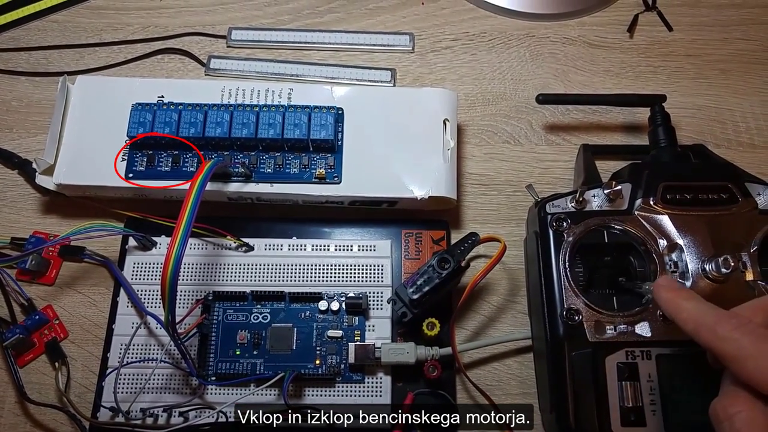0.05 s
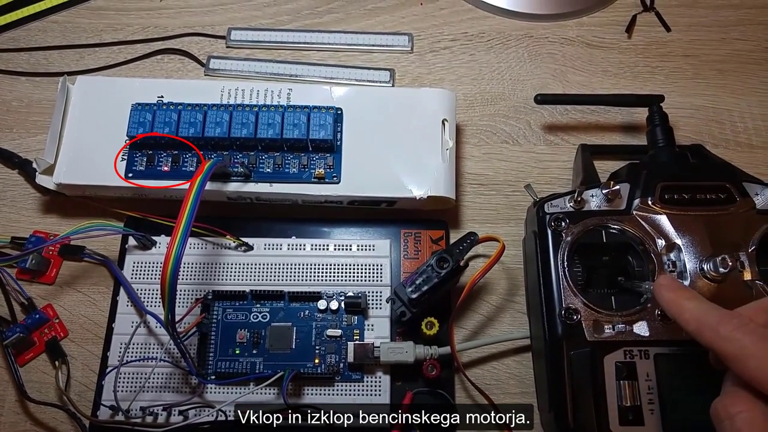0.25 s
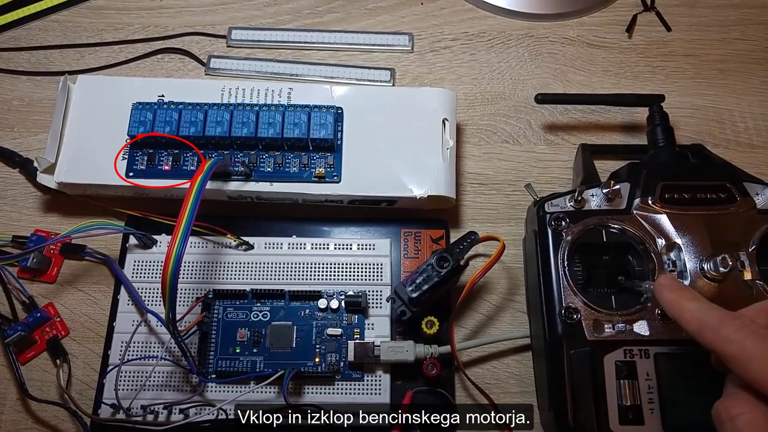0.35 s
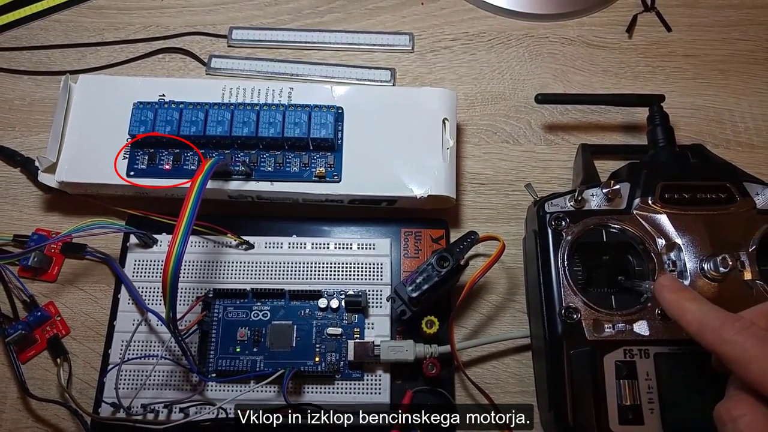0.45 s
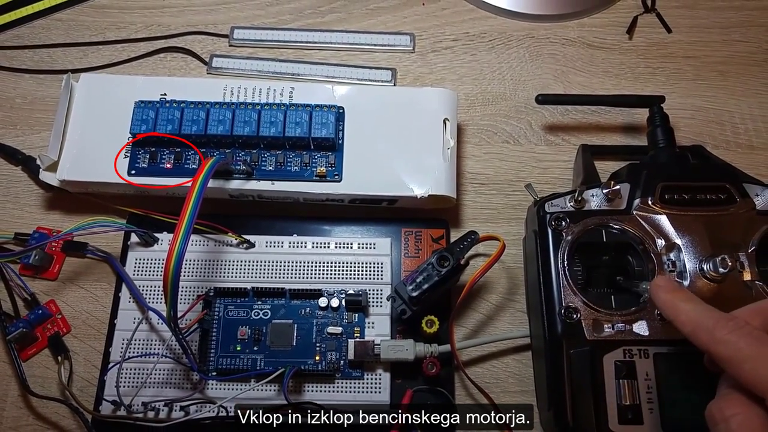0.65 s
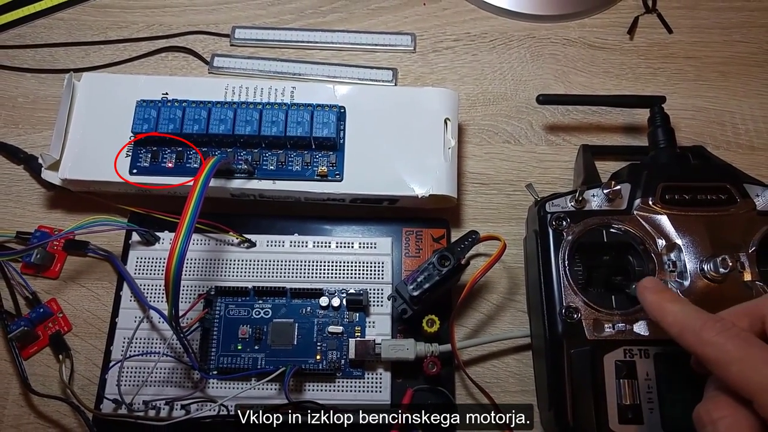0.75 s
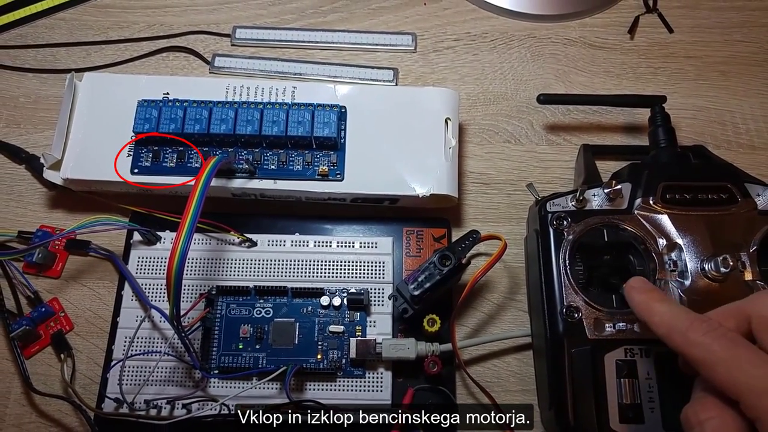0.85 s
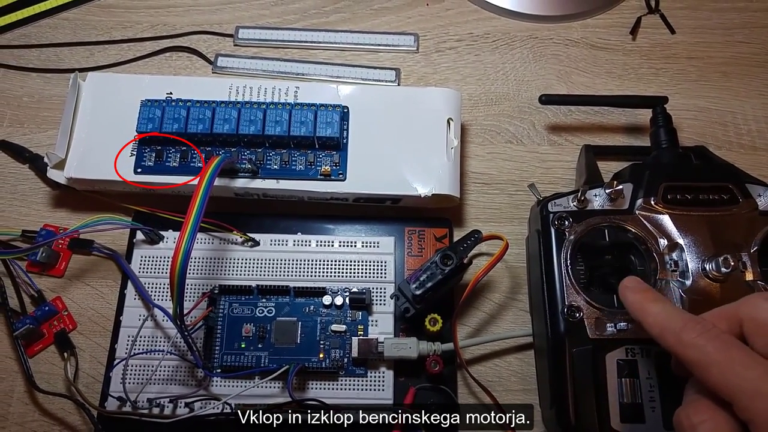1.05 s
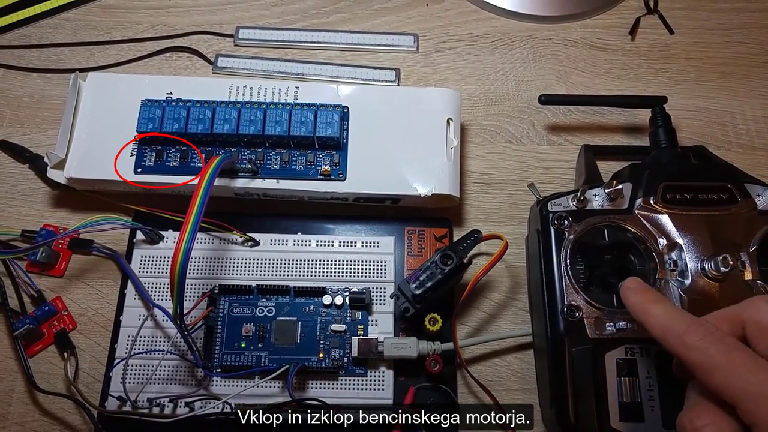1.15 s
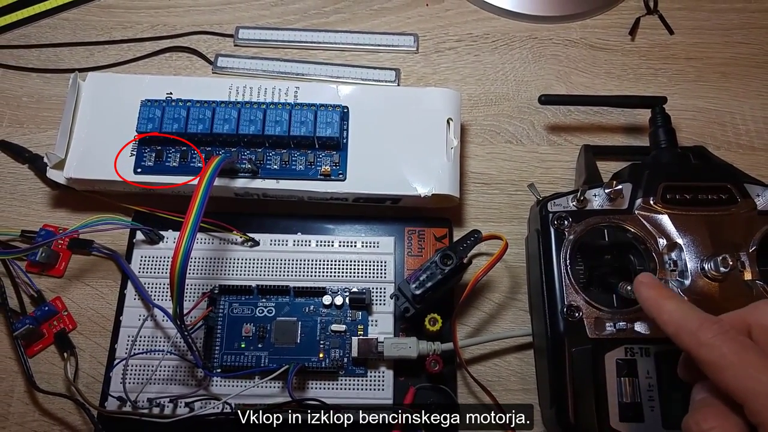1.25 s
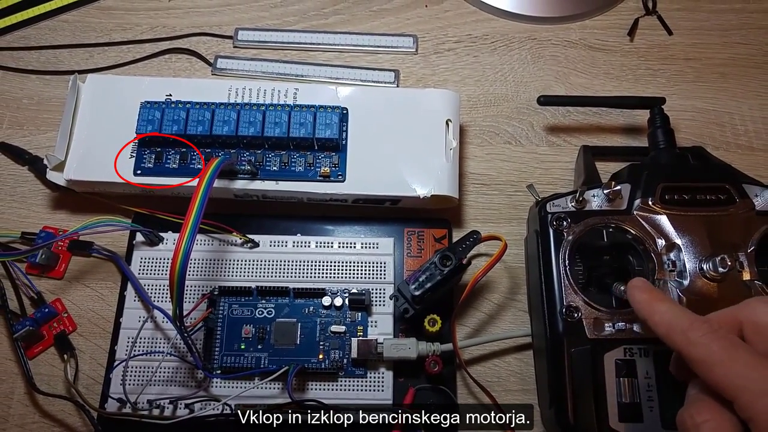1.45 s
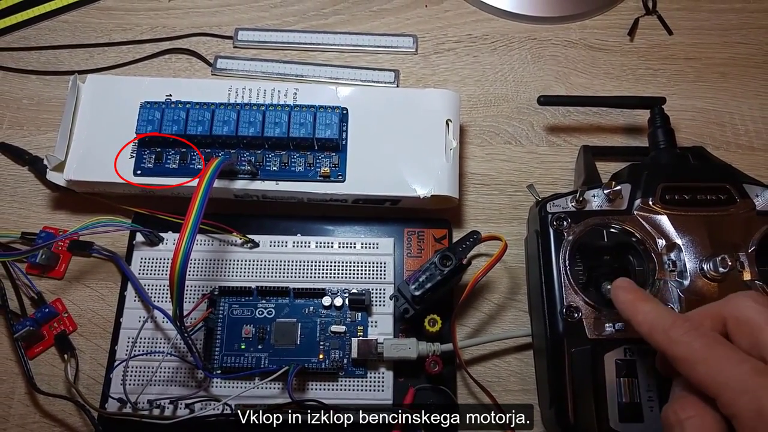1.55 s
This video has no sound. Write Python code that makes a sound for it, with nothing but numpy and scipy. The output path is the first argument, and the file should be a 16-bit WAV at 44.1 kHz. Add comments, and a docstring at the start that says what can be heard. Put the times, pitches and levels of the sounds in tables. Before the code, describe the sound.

Close in stereo, one hard bright relay click with a slight low thump, a pause, then a second slightly different click; barely audible hand knocks and ticks, soft fan rush and thin electrical whine in a small room.

```python
"""A small room: a relay on a board lying on a plastic box switches twice, close to a stereo camera.
On pull-in and on release a burst of contact blows rings the shell modes, then the box modes; a boom follows
the pull-in. Faint ticks and dull hand knocks lie around them, and a noise tail gives the room's reflections.
A fan hums in wavering sines, a supply whines in harmonics, and shaped noise makes fan rush and hiss."""
import sys
import numpy as np
from scipy import signal
from scipy.fft import rfft, irfft
from scipy.io import wavfile
from scipy.ndimage import uniform_filter1d

SR = 44100
rng = np.random.default_rng(int(sys.argv[2]) if len(sys.argv) > 2 else 0)


def makeup_ratio(level_db):
    """Linear amplitude ratio for a level in decibels (20 dB per factor of ten)."""
    decades = np.asarray(level_db, float) / 20
    return 10 ** decades


def file_out(sig):
    """Save sig as 16-bit WAV at sys.argv[1]."""
    # one column per channel
    cols = np.atleast_2d(sig).T
    # limit, then scale
    lim = np.clip(cols, -1, 1)
    pcm = np.round(lim * 32767).astype(np.int16)
    wavfile.write(sys.argv[1], SR, pcm)


N = 70560

# Contact blows of each stroke. Each row: start in seconds, level in dB, left minus right in dB.
PULL_IN_BLOWS = [(.2340, -36, 0), (.2356, -32, 0), (.2364, -14, 2), (.2371, -1, 3), (.2375, -2, -2),
                 (.2381, -2, 7), (.2385, -3, 7), (.2391, -8, 0), (.2399, -15, -12), (.2405, -16, -12),
                 (.2411, -17, -4), (.2428, -18, 2)]
RELEASE_BLOWS = [(.9340, -38, 0), (.9362, -28, 0), (.9373, -2, 1), (.9383, -2, 2), (.9396, -4, 2),
                 (.9405, -3, 0), (.9409, -5, 0), (.9415, -8, 2), (.9434, -10, -3), (.9448, -14, 0)]
# Relay shell modes. Each row: nominal pitch in Hz, t60 in seconds, level on pull-in in dB, on release in dB.
SHELL_MODES = [(2500, 0.015, -31.5, -23.5), (3210, .003, -53.5, -46), (3830, 0.0078, -24.5, -20.5),
               (4610, 0.009, -42, -22), (6160, .003, -14.5, -37), (6770, 0.0067, -6, -9.5),
               (7870, 0.0024, -15, 2), (8540, 0.0043, 1, -1.5), (8897, 0.009, 1.5, -0.5),
               (9740, .003, -28.5, -0.5), (10777, 0.0055, -11.5, -16), (11660, 0.022, -15, -31),
               (13200, .003, -20.5, -30.5), (14200, 0.009, -19.5, -29.5), (14170, .004, -23, -26)]
# Box and bench modes. Each row: pitch in Hz, t60 in seconds, level on pull-in in dB, on release in dB.
BOX_MODES = [(59.5, 0.1, -46.5, -58.5), (242, 0.24, -42.5, -48), (324, 0.08, -35, -44.5),
             (390, 0.11, -52, -35.5), (471, 0.1, -37.5, -47), (648.2, 0.073, -24, -14),
             (708.6, 0.072, -25, -14), (945, 0.051, -37, -22), (1153, .04, -28, -27),
             (1370, 0.042, -54, -24.5), (1960, .02, -52.5, -34.5)]
# Low boom after the pull-in. Each row: start in seconds, pitch in Hz, level in dB, rise in seconds,
# t60 in seconds.
BOOMS = [(.255, 127.2, -22, 0.018, 0.13)]
# Faint ticks. Each row: start in seconds, pitch in Hz, level in dB, t60 in seconds, left minus right in dB.
FAINT_TICKS = [(0.734, 7000, -46, 0.0034, 3), (0.7384, 7100, -44.5, 0.0044, 26),
               (1.088, 1040, -50.5, 0.026, 1), (1.088, 1500, -54.5, 0.021, 7)]
# Dull knocks of the hand on the bench or controller. Each row: start in seconds, centre in Hz, width in Hz,
# noise level before the envelope in dB, rise in seconds, t60 in seconds.
HAND_KNOCKS = [(.27, 298, 300, -41.5, .02, 0.18), (0.969, 119.7, 100, -53.5, 0.018, 0.3),
               (1.11, 148, 121, -48, 0.0094, 0.115), (1.388, 400, 100, -49.5, 0.025, .12),
               (1.499, 182, 80, -57.5, 0.014, 0.36)]
# Room tail bands. Each row: centre in Hz, t60 in seconds, level in dB.
ROOM_BANDS = [(126.8, 0.5, -25), (250, 0.26, -19), (497, 0.24, -7.5), (990, 0.22, -5.5), (2000, 0.14, 0.5),
              (4252, 0.23, -2.5), (6500, 0.19, -3), (9200, .21, -12), (12600, 0.11, 2), (14500, .18, -1.5),
              (16000, .18, -5)]
# Fan hum tones. Each row: pitch in Hz, mean level in dB rms, left minus right in dB, left phase lead in
# radians, waver in dB.
HUM_TONES = [(120, -75, -1, .3, 3), (243.5, -63, 0, .1, 1), (292, -78, 0, .5, 3), (575, -80, 0, 1, 3),
             (670, -80, 0, 1, 2), (719, -70, 0, 1.3, 3), (767.5, -71, 0, 1.3, 3)]
# Supply whine harmonics. Each row: multiple of WHINE_HZ, mean level in dB rms, left minus right in dB.
WHINE_HARMONICS = [(3, -68, 14), (4, -86, 0), (5, -82, -4), (6, -96, 0)]
# Background noise spectrum. Each row: frequency in Hz, relative density in dB per Hz.
FLOOR_SPECTRUM = [(20, -49), (30, -25), (80, -18), (125, -17), (190, -16.5), (290, -11), (400, -10.5),
                  (500, -30.5), (650, -5), (800, -14.5), (900, -17), (1200, -22.5), (2000, -25.5),
                  (3600, -29.5), (5500, -28.5), (6300, -24.5), (7000, -20.5), (7600, -31.5), (8100, -26.5),
                  (10000, -25.5), (12300, -26.5), (13500, -39), (16000, -63.5)]
# Background stereo likeness. Each row: frequency in Hz, likeness of left and right from -1 to 1.
FLOOR_LIKENESS = [(60, 0.8), (130, 0.5), (290, .85), (640, 0.18), (1400, -0.13), (6800, -0.17)]
# Background stereo lean. Each row: frequency in Hz, left minus right in dB.
FLOOR_LEAN = [(60, -1), (2400, -1), (4400, -2.5), (7000, 23.5), (10000, -0.5), (15000, -5)]

CRACK_DB, RIGHT_LAG_S = -14.5, .0002
PHASE_SPREAD_RAD, DETUNE = .8, .025  # spread of mode phase and of fractional pitch from blow to blow
BOX_LATE_S, BOX_RISE_S, BOX_PAN_DB, BOX_LAG_S = .0022, .0021, 3.5, .00017
ROOM_START_S = .003
WHINE_HZ = 2423.6
FLOOR_DB = -60.5  # rms over both sides
TOP_HZ = 16200


def read(table, hz):
    """A (Hz, value) table read on a log-frequency axis."""
    a = np.array(table, float)
    return np.interp(np.log(np.maximum(hz, 1)), np.log(a[:, 0]), a[:, 1])


def band_weight(centres_hz, k, hz):
    """Triangle on log frequency: 1 at centre k, 0 at its neighbours; end bands stay at 1 beyond."""
    return read([(f, float(j == k)) for j, f in enumerate(centres_hz)], hz)


def pan(db):
    """Left and right gains as a column, from left minus right in dB."""
    return makeup_ratio(np.array([[db / 2], [-db / 2]]))


def ring(hz, t60_s, rise_s=0., phase=0., late_s=0.):
    """One decaying mode, .4 s long, with a soft start; 0 Hz at phase pi/2 gives the bare envelope."""
    t = np.maximum(np.arange(int(.4 * SR)) / SR - late_s, 0)
    onset = (1 - np.exp(-t / (rise_s + 1e-5))) ** 2
    return np.sin(2 * np.pi * hz * t + phase) * onset * 1000. ** (-t / t60_s)


def add(out, start_s, x):
    """Mix x into out at start_s."""
    i = int(start_s * SR)
    out[:, i:i + x.shape[1]] += x[:, :N - i]


def walk(rate_hz):
    """Slow random wander held within -2..2."""
    k = int(SR / rate_hz)
    held = np.repeat(rng.standard_normal(N // k + 5), k)
    smooth = uniform_filter1d(uniform_filter1d(held, k), k)
    return 2 * np.tanh(.7 * smooth[2 * k:2 * k + N])


def shell_blow(column, late_s):
    """One contact blow: shell modes with scattered phase and pitch, plus a short noise crack."""
    spread = [[PHASE_SPREAD_RAD], [DETUNE]]
    phases, detunes = rng.standard_normal((2, len(SHELL_MODES))) * spread
    blow = 0
    for mode, phase, detune in zip(SHELL_MODES, phases, detunes):
        blow = blow + makeup_ratio(mode[column]) * ring(mode[0] * (1 + detune), mode[1], 76e-6, phase, late_s)
    crack = rng.standard_normal(len(blow)) * ring(0, .0014, 0, np.pi / 2, late_s)
    return blow + makeup_ratio(CRACK_DB) * crack


def box_ring(column):
    """Box and bench modes with a soft rise, the right side lagging the left."""
    phases = rng.uniform(0, 2 * np.pi, len(BOX_MODES))
    sides = []
    for late_s in (0, BOX_LAG_S):
        sides.append(sum(makeup_ratio(mode[column]) * ring(mode[0], mode[1], BOX_RISE_S, phase, late_s)
                         for mode, phase in zip(BOX_MODES, phases)))
    return pan(BOX_PAN_DB) * np.array(sides)


def relay():
    """Contacts strike and bounce, each blow ringing the shell; the hardest of a stroke sets the box going."""
    out = np.zeros((2, N))
    for column, blows in ((2, PULL_IN_BLOWS), (3, RELEASE_BLOWS)):
        for start_s, db, lean_db in blows:
            for side, late_s in enumerate((0, RIGHT_LAG_S)):
                gain = makeup_ratio(db) * pan(lean_db)[side]
                add(out[side:side + 1], start_s, (gain * shell_blow(column, late_s))[None])
        hardest = max(blows, key=lambda blow: blow[1])
        add(out, hardest[0] + BOX_LATE_S, box_ring(column))
    return out


def boom():
    """A low decaying sine with a slow rise, after the pull-in."""
    out = np.zeros((2, N))
    for start_s, hz, db, rise_s, t60_s in BOOMS:
        add(out, start_s, pan(-1.4) * makeup_ratio(db) * ring(hz, t60_s, rise_s))
    return out


def ticks():
    """Faint, sharply starting decaying sines."""
    out = np.zeros((2, N))
    for start_s, hz, db, t60_s, lean_db in FAINT_TICKS:
        add(out, start_s, pan(lean_db) * makeup_ratio(db) * ring(hz, t60_s, 67e-6))
    return out


def knocks():
    """Dull hand knocks: resonant noise under a soft rise and decay."""
    out = np.zeros((2, N))
    for start_s, hz, width_hz, db, rise_s, t60_s in HAND_KNOCKS:
        envelope = ring(0, t60_s, rise_s, np.pi / 2)
        b, a = signal.iirpeak(hz, hz / width_hz, fs=SR)
        noise = signal.lfilter(b, a, rng.standard_normal(len(envelope)))
        add(out, start_s, pan(-.63) * makeup_ratio(db) * envelope * noise / np.std(noise))
    return out


def room(near):
    """Dense reflections, different left and right, dying band by band."""
    n = int(.45 * SR)
    t, hz = np.arange(n) / SR, np.fft.rfftfreq(n, 1 / SR)
    spec, tail = rfft(rng.standard_normal((2, n))), 0
    centres_hz = [row[0] for row in ROOM_BANDS]
    for k, (_, t60_s, db) in enumerate(ROOM_BANDS):
        band = irfft(spec * band_weight(centres_hz, k, hz), n)
        decay = 1000. ** (-t / t60_s) / np.sqrt(t60_s * SR / np.log(1e6))  # unit energy
        tail = tail + makeup_ratio(db) * band * decay
    # silent until ROOM_START_S, full at twice that
    tail = tail * np.clip(t / ROOM_START_S - 1, 0, 1)
    return signal.fftconvolve(near, tail, axes=1)[:, :N]


def fan_hum():
    """Low sines wavering in level and phase, the left side leading."""
    t, out = np.arange(N) / SR, 0
    for hz, db, lean_db, lead_rad, waver_db in HUM_TONES:
        phase = 2 * np.pi * hz * t + rng.uniform(0, 2 * np.pi) + .5 * walk(1.7)
        level = np.sqrt(2) * makeup_ratio(db + waver_db * walk(7.3))
        out = out + pan(lean_db) * level * np.sin(phase + np.array([[lead_rad], [0]]))
    return out


def supply_whine():
    """Harmonics of one fixed pitch, wavering slightly in level."""
    t, out = np.arange(N) / SR, 0
    for multiple, db, lean_db in WHINE_HARMONICS:
        phase = rng.uniform(0, 2 * np.pi)
        level = np.sqrt(2) * makeup_ratio(db + .7 * walk(3.5))
        out = out + pan(lean_db) * level * np.sin(2 * np.pi * round(multiple) * WHINE_HZ * t + phase)
    return out


def background():
    """Fan rush and hiss: octave-spaced noise bands flicker on their own; the bass is alike on both sides."""
    hz = np.fft.rfftfreq(N, 1 / SR)
    alike, half_lean_db = np.clip(read(FLOOR_LIKENESS, hz), -.99, .99), read(FLOOR_LEAN, hz) / 2
    mid, side = rfft(rng.standard_normal((2, N)))
    stereo = mid * np.sqrt(1 + alike) + side * np.sqrt(1 - alike) * np.array([[1], [-1]])
    spec = stereo * makeup_ratio(read(FLOOR_SPECTRUM, hz) + [half_lean_db, -half_lean_db])
    centres_hz, out = 30 * 2. ** np.arange(10), 0
    for k in range(len(centres_hz)):
        flicker = makeup_ratio(2.6 * walk(4.8))
        out = out + flicker * irfft(spec * band_weight(centres_hz, k, hz), N)
    return out * makeup_ratio(FLOOR_DB) / np.sqrt(np.mean(out ** 2))


def scene():
    """Relay, boom, ticks and knocks in the room, over the machines and background."""
    near = relay() + boom() + ticks() + knocks()
    return near + room(near) + fan_hum() + supply_whine() + background()


def top_cut(x):
    """Nothing passes above the cut-off."""
    return signal.sosfilt(signal.butter(12, 16390, fs=SR, output="sos"), x)


def record(dry):
    """A steep low-pass cuts the top and peaks are limited to full scale."""
    low_pass = signal.ellip(8, .2, 60, TOP_HZ, fs=SR, output="sos")
    mix = np.clip(signal.sosfilt(low_pass, dry), -1, 1)
    return top_cut(mix)


dry = scene()
out = record(dry)
file_out(out)
```